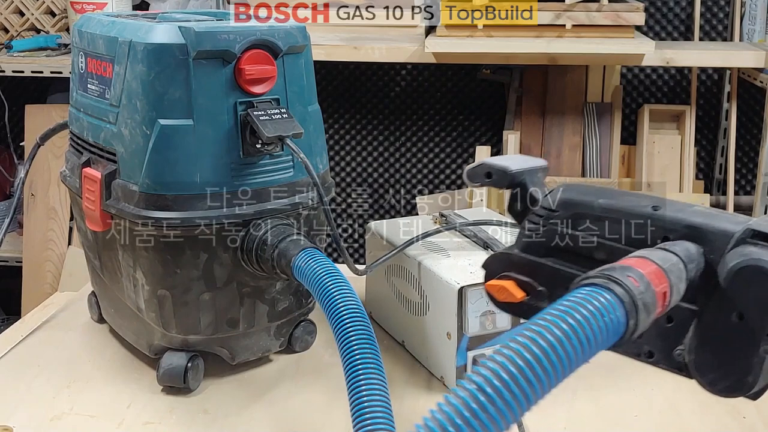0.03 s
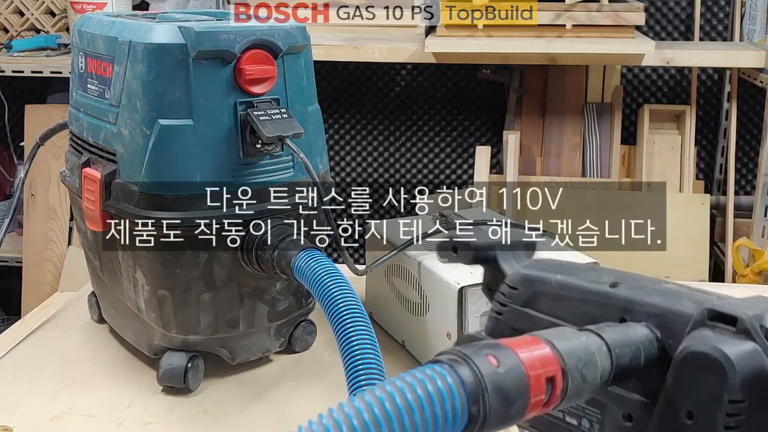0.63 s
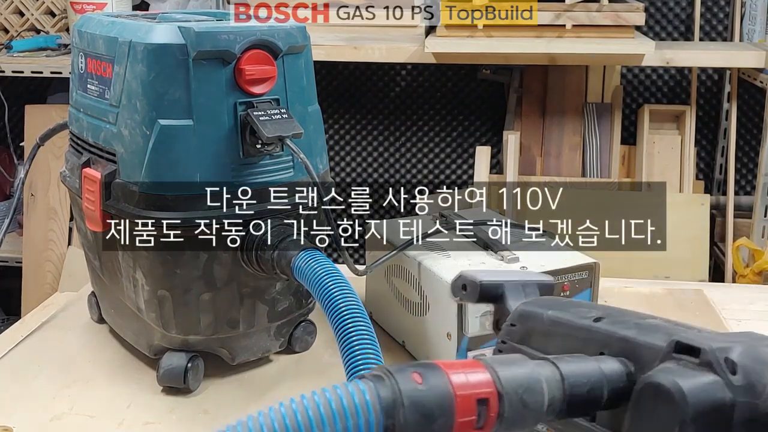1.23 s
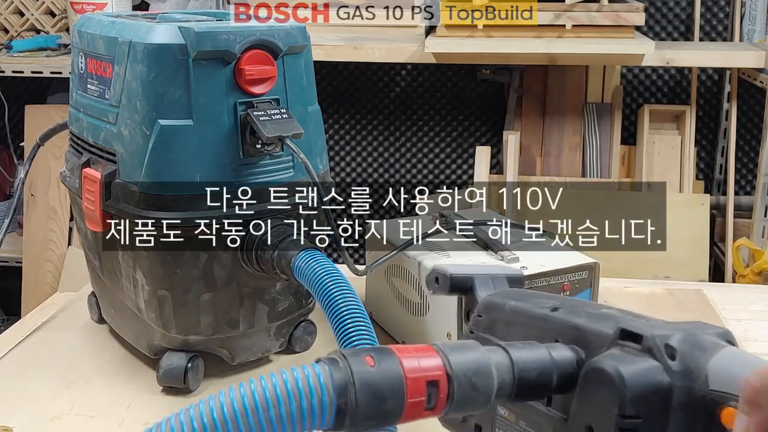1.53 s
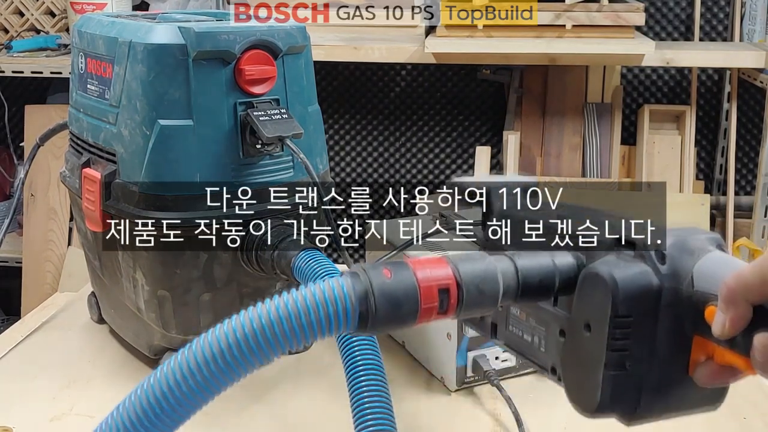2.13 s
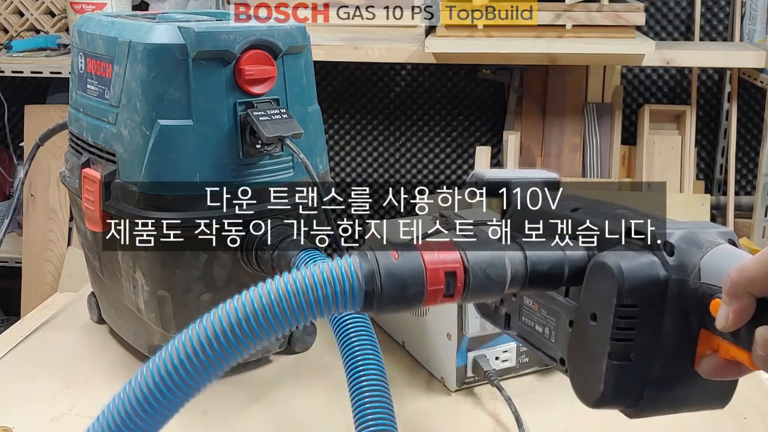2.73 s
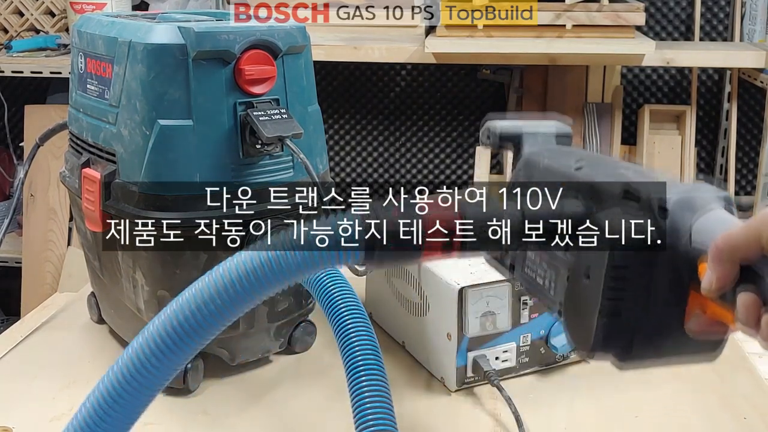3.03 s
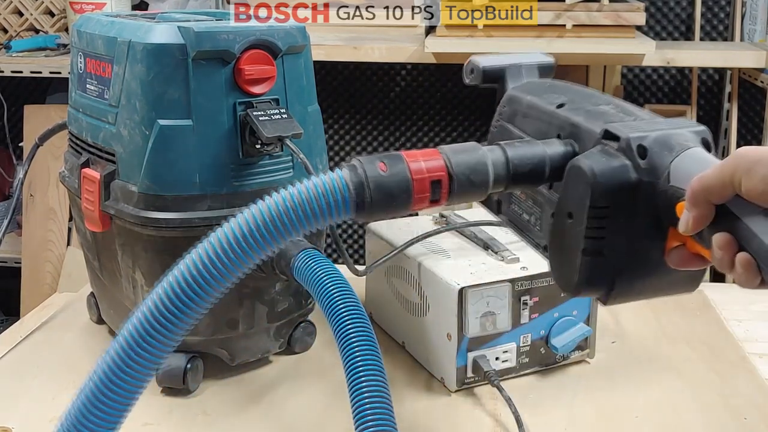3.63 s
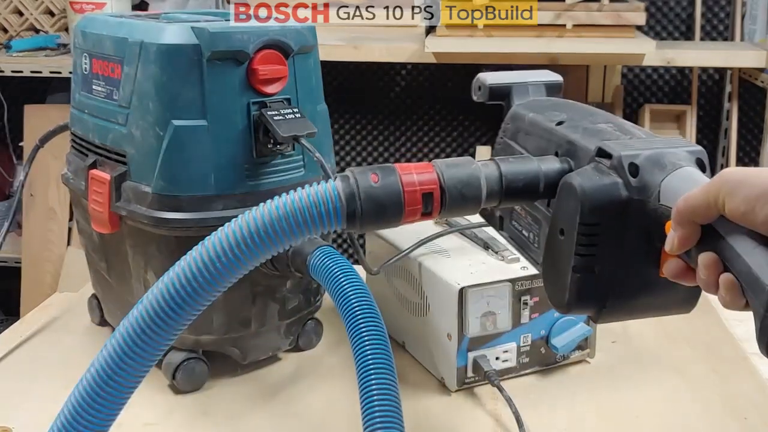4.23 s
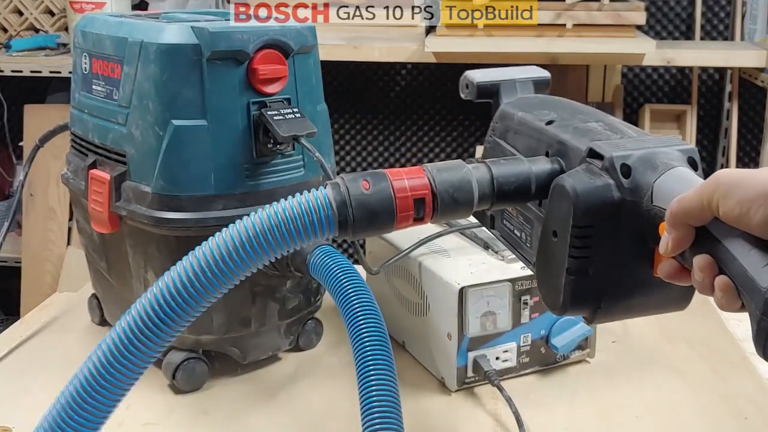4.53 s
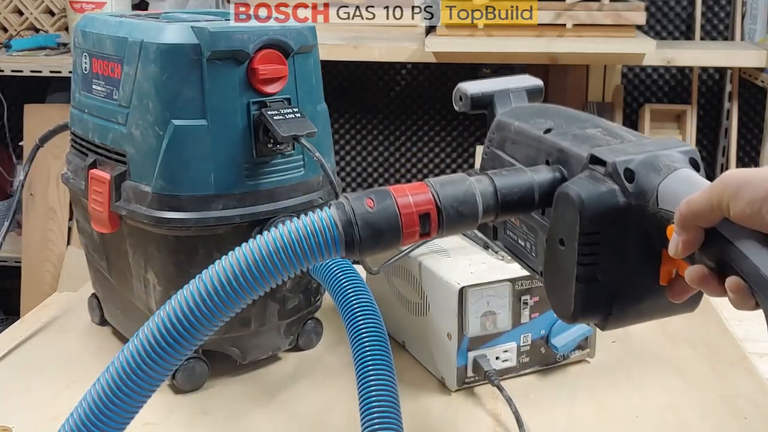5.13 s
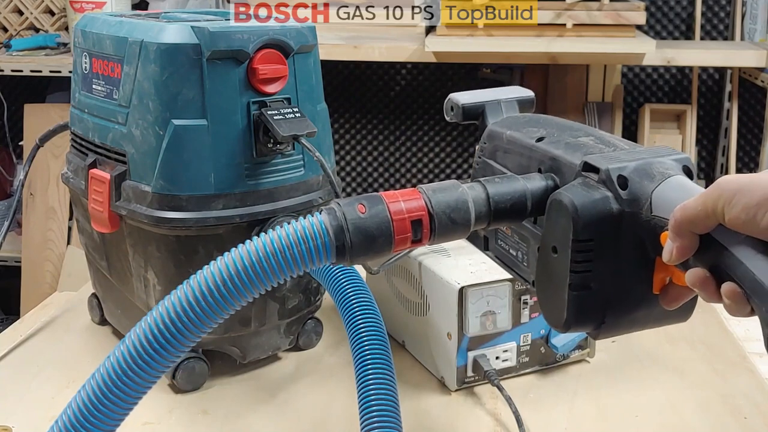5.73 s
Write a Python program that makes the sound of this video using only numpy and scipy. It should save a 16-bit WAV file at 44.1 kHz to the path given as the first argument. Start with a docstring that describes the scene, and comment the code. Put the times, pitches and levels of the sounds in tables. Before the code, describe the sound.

In a quiet workshop, faint rasps of a vacuum hose, a few dull bumps and low handling rumble come first. Then, near the microphone, a switch snaps and an electric tool knocks and whines quickly up to speed, joined by a shop vacuum's rushing air and hum. The tool runs only briefly before coasting down in pitch under the steady roar of the vacuum.

```python
"""Power tool in a woodshop

A corded tool is lifted, dragging its ribbed hose, and switched on close by. The trigger clicks, and the
motor jolts with the mains, whines up to speed and coasts down once the trigger is let go.
The dust extractor it is plugged into starts with it and keeps running, roaring and hissing with air."""
import sys
import numpy as np
from scipy import signal
from scipy.fft import rfft, irfft
from scipy.io import wavfile

SR = 44100
rng = np.random.default_rng(int(sys.argv[2]) if len(sys.argv) > 2 else 0)


def inscribe(sig):
    """Save sig as 16-bit PCM at rate SR to the path in sys.argv[1].

    A 1-D sig is mono; a 2-D sig holds one channel per row.
    Samples are clipped to [-1, 1] before scaling.
    """
    pcm = np.round(np.clip(np.atleast_2d(sig).T, -1, 1) * 32767)
    wavfile.write(sys.argv[1], SR, pcm.astype(np.int16))


N = 254898
TIME = np.arange(N) / SR
FREQ = np.fft.rfftfreq(N, 1 / SR)
SIDES = np.array([[.5], [-.5]])  # shares a left-minus-right amount between the two channels

PULSE_HZ = 120  # the power pulses twice in each mains cycle
BLADES = 5  # on the tool's fan and on the extractor's
SPIN_S, RELEASE_S, FULL_HZ = 3.593, 4.672, 431  # shaft breaks free, trigger let go, top turns per second

# Levels in the tables are relative: each sound also has its own overall loudness.
# the motor's weaker whines: cycles_per_turn
WHINE_MULTIPLES = (1, 2, 8, 10, 12, 15, 16, 19, 25)
# strength of each of those whines: full_speed_db, third_speed_db
WHINE_LEVELS = [(-29.5, -50), (-40, -58), (-34, -61), (-40, -37.5), (-46, -45), (-38, -36), (-58, -53),
                (-36.5, -33.5), (-44, -47.5)]
# strength of the fan blades' tone: full_speed_db, third_speed_db
BLADE_LEVELS = (-24.5, -29.5)
# shaft speeds where a whine swells, listed by cycles_per_turn: shaft_hz, width_hz, boost_db
CRITICAL_SPEEDS = {10: (194, 36, 4), 15: (137, 28, 7), 19: (366, 50, 2)}
# pitches where the motor's tones swell or fade as they sweep through: pitch_hz, width_hz, boost_db
TONE_PEAKS_AND_DIPS = [(595, 33, 7), (745, 65, -10.5), (908, 94, 7), (1040, 26, -12), (1480, 55, 6),
                       (1908, 916, 12.5), (2062, 31, -4), (2440, 390, -5.5), (3130, 680, 7.5),
                       (4914, 660, 7), (5650, 330, -1), (6870, 1280, 10.5), (9120, 900, -14.5)]
# the tool's cooling air: pitch_hz, level_db
COOLING_COLOUR = [(100, -37), (300, -16), (600, -4), (1300, 6.5), (2000, 8.5), (2500, 5), (3200, -20),
                  (6000, -4), (7200, 5.5), (8500, -9.5), (15000, -12)]
# where the tool is heard: pitch_hz, left_minus_right_db
TOOL_BALANCE = [(200, 0), (700, 2), (1300, 1.5), (2100, -7), (4400, 5.5), (8000, -4.5), (15000, 2)]
# the trigger's click, then the drive knocking as it takes up its slack: start_s, level_db
START_KNOCKS = [(3.457, -16.5), (3.544, -11), (3.594, -7), (3.652, -13), (3.661, -9.5), (3.67, -2.5),
                (3.679, -14)]
# how the trigger and the drive ring: pitch_hz, level_db, ring_s (time to fade by 60 dB)
KNOCK_RINGS = [(480, -30, 0.05), (823, 3.5, 0.021), (1100, -32, 0.021), (1440, -5, 0.022),
               (1923, -6.5, 0.044), (2090, -27, 0.02), (3070, -19, 0.016), (5050, -25, 0.023),
               (6700, -30, 0.027)]
# the tool's shuddering body: pitch_hz, level_db
SHUDDER_COLOUR = [(53, -61), (90, -30), (118, -4.5), (185, -33), (223, 1), (264, -26), (403, 2.5),
                  (448, -47), (669, -12), (899, 7), (1090, -5), (2090, 9.5), (2580, -4.5), (6830, -20),
                  (14000, -98)]

# air rushing through the extractor: pitch_hz, level_db
AIRFLOW_COLOUR = [(40, -34), (80, -14), (140, -9), (300, -7.5), (470, -4.5), (780, -0.5), (1300, -5.5),
                  (1800, -5), (2500, -6), (3100, -8), (4600, -9.5), (6000, -11.5), (7000, -3.5),
                  (8000, -13)]
# the top of the rushing air's hiss, brightest near 7 kHz: pitch_hz, level_db
HIGH_HISS_COLOUR = [(5500, 0), (6200, -10), (6900, 5), (7700, -5.5), (8400, -15.5), (9300, -8), (10000, -7),
                    (12000, -7.5), (12700, -21), (15500, -25)]
# pitches that the extractor's tank and hose boost: pitch_hz, width_hz, boost_db
TANK_RESONANCES = [(132.4, 9.6, 7.5), (226.5, 26, 6.5), (554.6, 13, 10), (589.6, 7.3, 9.5), (655, 15, 6.5),
                   (886, 4.8, 9), (938, 10, 7), (1150, 22, 9.5), (1270, 5.6, 12), (1434, 4, 14),
                   (1735, 79, 9), (1920, 148, 13), (2205, 18, 13.5), (3060, 180, 8.5)]
# the lid's resonance, which the extractor's hum climbs into: pitch_hz, width_hz, boost_db
LID_RESONANCE = [(431.2, 18, 19)]
# where the extractor's air is heard: pitch_hz, left_minus_right_db
AIRFLOW_BALANCE = [(60, 1), (110, -0.5), (200, 0.5), (380, 1), (700, 3), (1290, 0), (2380, -6), (4400, 1.5),
                   (8120, -3), (15000, 13)]

# slides of the hose as the tool is lifted: middle_s, half_length_s, rasp_db, hiss_db
HOSE_SLIDES = [(0.078, 0.25, -56, -61), (0.344, 0.085, -63, -64), (.53, 0.085, -57, -58),
               (0.754, 0.096, -56, -56.5), (1.116, 0.11, -49.5, -49.5), (1.258, 0.17, -60.5, -61),
               (1.556, 0.21, -78, -73.5)]
# the hose's rubbing sound: pitch_hz, level_db
RUB_COLOUR = [(200, -2), (400, -1), (650, 3), (1250, 0.5), (1800, 3), (2400, -2.5), (3500, -5.5),
              (4600, -11.5), (6100, -16), (7100, -8.5), (8400, -41), (11500, -23.5), (15000, -40)]
# pitches that the ribbed hose boosts: pitch_hz, width_hz, boost_db
HOSE_RESONANCES = [(1930, 71, 3), (2430, 260, 1.5), (3000, 40, 5.5), (4270, 110, 5)]
# where the hose is heard: pitch_hz, left_minus_right_db
HOSE_BALANCE = [(60, -3), (110, 2.0), (200, 2), (380, 0), (700, 0.0), (1290, -2.5), (2380, -11.5),
                (4400, -5), (8120, -19.5), (15000, 14)]
# hose and cable bumping the bench: start_s, level_db
BENCH_BUMPS = [(0.182, -24.5), (0.274, -30), (0.294, -21), (0.321, -31)]
# the dull thud of a bump: pitch_hz, level_db
THUD_COLOUR = [(60, 2), (120, -2), (240, 9.5), (450, -1), (900, -5.5), (1400, -16), (2200, -17),
               (4000, -47), (12000, -55)]
# the hand shifting its grip: middle_s, half_length_s, level_db
GRIP_SHIFTS = [(.05, 0.16, -50.5), (.44, 0.097, -46.5), (.75, 0.36, -56.5), (1.42, 0.23, -59),
               (2.36, 0.016, -50), (2.66, 0.17, -60)]
# the rumble of the grip: pitch_hz, level_db
GRIP_COLOUR = [(12, -39), (20, 7.5), (33, 3), (76, 4.5), (126, -5), (145, -13), (252, -7.5), (371, -16),
               (400, -11), (520, -34), (880, -120)]

# the quiet of the shop: pitch_hz, level_db
SHOP_COLOUR = [(59, -34), (100, 3), (252, -13), (297, -6.5), (337, -21), (407, -8.5), (582, -15.5),
               (1810, -26), (2520, -28), (4450, -34), (15000, -60)]
# how alike left and right sound: pitch_hz, likeness (0 unrelated, 1 the same)
STEREO_LIKENESS = [(60, 0.97), (280, 0.96), (640, 0.57), (1400, 0.41), (3000, 0), (15000, 0)]


def power_tool(wobble=0.001504, left_lag_s=.00009, load_db=10, spindle_db=-39, air_db=-28, fade_s=0.14):
    """The motor's fan tone, whines and cooling air all follow the speed of its shaft."""
    hz = shaft_hz() * (1 + wobble * walk(21.6))
    speed, powered = hz / FULL_HZ, TIME < RELEASE_S
    slowness = np.minimum((1 - speed) * 3 / 2, 1)  # 0 at full speed, 1 at a third of it
    load = powered * (1 - speed)
    angle = 2 * np.pi * (np.cumsum(hz) / SR - SIDES * left_lag_s * hz)  # the tool is nearer the right

    def gain(multiple, fast_db, slow_db):
        """A tone's strength follows speed and load, and swells or fades at certain pitches."""
        db = fast_db + (slow_db - fast_db) * slowness + load_db * load
        db += resonances(TONE_PEAKS_AND_DIPS, multiple * hz)
        return undb(db + SIDES * at(TOOL_BALANCE, multiple * hz))

    # while the trigger is held, the motor pulses with the mains, hardest when it is still slow
    mains = 2 * np.pi * PULSE_HZ * TIME
    throb = 1 + (0.31 * powered + 0.44 * load) * np.cos(mains)
    blades = tone(BLADES * angle - 0.025 * powered * np.sin(mains), rough=0.17, flutter_hz=62)
    blades *= throb * gain(BLADES, *BLADE_LEVELS)
    # with the power off, the shaft shivers in its bearings, which roughens the high whines
    shiver = np.where(powered, .012, .055)
    whines = 0
    for multiple, levels in zip(WHINE_MULTIPLES, WHINE_LEVELS):
        whine = tone(multiple * (angle + shiver * walk(54)), rough=.3, flutter_hz=36)
        waver_db = walk(8.9)
        swell_db = resonances([CRITICAL_SPEEDS[multiple]], hz) if multiple in CRITICAL_SPEEDS else 0
        whines += whine * gain(multiple, *levels) * undb(waver_db + swell_db)
    whines *= 1 + 0.23 * powered * np.cos(mains)
    # the geared-down spindle hums at about half the motor's rate
    spindle = tone(angle * .512, rough=.25, flutter_hz=12) * speed ** 12 * undb(spindle_db)
    air = noise(at(COOLING_COLOUR, FREQ), at(TOOL_BALANCE, FREQ)) * undb(air_db) * speed ** 4.7
    # the fan tone has little echo; the whines beam into the shop and come back smeared
    near = room(blades + spindle, ring_s=0.16, echo_db=-13)
    smeared = room(whines, ring_s=0.19, echo_db=-4)
    return (near + smeared + air) * np.clip((TIME - SPIN_S) / fade_s, 0, 1)


def shaft_hz(surge_s=.0808, creep_s=.2735, surge_share=.522, drag_s=1.81, friction_hz_per_s=186.5):
    """Turns per second: a quick surge and a slow creep up, then air drag and rubbing brushes brake it."""
    driven = FULL_HZ * (surge_share * rise(SPIN_S, surge_s) + (1 - surge_share) * rise(SPIN_S, creep_s))
    held = np.minimum(driven, np.interp(RELEASE_S, TIME, driven))
    lost = (held + friction_hz_per_s * drag_s) * rise(RELEASE_S, drag_s)
    return np.maximum(held - lost, 1)


def switch_on():
    """The jolt of starting: shudder and knocks echo in the shop, while the trigger's snap stays dry."""
    return room(motor_shudder() + drive_knocks(), ring_s=0.46, echo_db=-3.5) + trigger_snap()


def motor_shudder(peak_s=3.662, rise_db_per_s=128, fall_db_per_s=180, buzz_db=6):
    """The straining motor shakes the tool's body with each mains pulse, and each knock adds a crack."""
    strain_db = -19.5 + np.minimum(rise_db_per_s * (TIME - peak_s), fall_db_per_s * (peak_s - TIME))
    pulses = np.cos(2 * np.pi * PULSE_HZ * (TIME - START_KNOCKS[-1][0] - .002))
    strain = undb(strain_db + buzz_db * pulses) * (TIME > START_KNOCKS[0][0])
    cracks = undb(-12) * blows(START_KNOCKS, decay_s=0.0057)
    force = noise(colour_db=0) * np.hypot(strain, cracks)
    body = undb(at(SHUDDER_COLOUR, FREQ))
    body /= np.sqrt(np.mean(body ** 2))
    return irfft(rfft(force) * body * undb(SIDES * at(TOOL_BALANCE, FREQ)), N)


def drive_knocks(gain_db=-10, balance_db=-3):
    """Trigger and drive knock in the housing, ringing at slightly different pitches each time."""
    knocks = 0
    for start_s, knock_db in START_KNOCKS:
        age = np.clip(TIME - start_s, 0, .2)
        contact = 1 - np.exp(-age / 0.00087)  # plastic gives a little
        for hz, ring_db, ring_s in KNOCK_RINGS:
            pitch_hz = hz * (1 + .02 * rng.standard_normal())
            ring = np.sin(2 * np.pi * pitch_hz * age) * 1000 ** (-age / ring_s)
            knocks += undb(knock_db + ring_db) * ring * contact
    return knocks * undb(gain_db + SIDES * balance_db)


def trigger_snap(peak_db=-25, decay_s=0.0014):
    """The trigger's contacts close with one short snap."""
    age = np.maximum(TIME - START_KNOCKS[0][0] - .001, 0)
    snap = sum(undb(db) * np.sin(2 * np.pi * hz * age) for hz, db, _ in KNOCK_RINGS)
    snap *= np.exp(-age / decay_s)
    return snap * undb(peak_db) / np.abs(snap).max()


def mains_hum(start_s=3.58, rise_s=0.097, decay_s=0.14, gain_db=-35):
    """The starting current makes the motor's iron hum, fading as the current falls."""
    age = np.maximum(TIME - start_s, 0)
    current = np.minimum(age / rise_s, 1) * np.exp(-age / decay_s)
    angle = 2 * np.pi * PULSE_HZ * TIME
    hum = sum(tone(multiple * angle, rough=1.0, flutter_hz=6.3) for multiple in (1, 2))
    return hum * current * undb(gain_db)


def extractor(start_s=3.46, flow_rise_s=0.2, fan_rise_s=.42, full_hz=428.1, split_hz=2600):
    """Air roars and hisses through tank and hose as the flow builds; the fan hums as it gathers speed."""
    flow, speed = rise(start_s, flow_rise_s), rise(start_s, fan_rise_s)
    colour = at(AIRFLOW_COLOUR, FREQ) + resonances(TANK_RESONANCES, FREQ)
    balance = at(AIRFLOW_BALANCE, FREQ)
    roar = noise(colour + cut_above(split_hz), balance, band_hz=(110, 750))
    roar *= undb(-30 + 1.07 * walk(5.2)) * flow
    hiss = noise(colour + cut_below(split_hz) + cut_above(6000, 12), balance, band_hz=(3600, 12000))
    high_hiss = noise(at(HIGH_HISS_COLOUR, FREQ) + cut_below(6000, 12), balance)
    treble = (undb(-29) * hiss + undb(-34.5) * high_hiss) * undb(.6 * walk(17)) * flow ** 2.76
    treble *= 1 + 0.081 * np.cos(2 * np.pi * PULSE_HZ * TIME)  # a slight throb
    hz = full_hz * speed
    angle = 2 * np.pi * np.cumsum(hz) / SR
    hum = tone(angle, rough=0.24, flutter_hz=2.166) * undb(-45 + resonances(LID_RESONANCE, hz))
    whine = tone(BLADES * angle, rough=0.35, flutter_hz=56) * undb(-37)
    return roar + treble + (hum + whine) * speed ** 2


def sliding_hose(split_hz=3300):
    """The ribbed hose slides in a few strokes, each with a rasp and a higher hiss."""
    middle_s, half_s, rasp_db, hiss_db = np.transpose(HOSE_SLIDES)
    colour = at(RUB_COLOUR, FREQ) + resonances(HOSE_RESONANCES, FREQ)
    close_right = dict(balance_db=at(HOSE_BALANCE, FREQ), min_likeness=0.58, left_lag_s=0.000423)
    rasp = noise(colour + cut_above(split_hz), band_hz=(1500, 3200), **close_right)
    hiss = noise(colour + cut_below(split_hz), band_hz=(3500, 8000), **close_right)
    rasp *= swells(zip(middle_s, half_s, rasp_db))
    hiss *= swells(zip(middle_s, half_s, hiss_db))
    return (rasp + hiss) * undb(0.51 * walk(120))  # the ribs catch unevenly


def bench_bumps():
    """Hose and cable land softly: short scuffs, dulled by the plastic and the bench."""
    scuffs = rng.standard_normal(N) * blows(BENCH_BUMPS, decay_s=0.0039)
    thuds = irfft(rfft(scuffs) * undb(at(THUD_COLOUR, FREQ)), N)
    return room(np.stack([thuds, thuds]), ring_s=0.34, echo_db=2)


def grip_rumble():
    """The hand on the tool makes a faint rumble that swells when the grip shifts."""
    rumble = noise(at(GRIP_COLOUR, FREQ))
    holding = undb(-67 + 3.5 * walk(11))
    return rumble * np.hypot(holding, swells(GRIP_SHIFTS))


def exhaust_puff(middle_s=3.81, half_length_s=0.056, level_db=-37):
    """A puff of exhaust air brushes the microphone: a deep thump on the right."""
    colour = at([(12, -40), (28, -14), (45, 16), (80, -1), (200, -23), (1000, -47)], FREQ)
    return noise(colour, balance_db=-19) * swells([(middle_s, half_length_s, level_db)])


def quiet_shop(level_db=-67):
    """The faint, steady, low noise of the room."""
    return noise(at(SHOP_COLOUR, FREQ), band_hz=(150, 15000)) * undb(level_db)


def room(sound, ring_s, echo_db):
    """A sound plus its many quick echoes from bench and shelves."""
    t = TIME[:SR // 2]
    tail = rng.standard_normal((2, len(t))) * 1000 ** (-t / ring_s) * (t > .002)
    tail /= np.sqrt(np.sum(tail ** 2, axis=1, keepdims=True))
    return sound + undb(echo_db) * signal.fftconvolve(sound, tail, axes=1)[:, :N]


def tone(phase, rough, flutter_hz):
    """A tone whose level and timing flutter, as when swirling air meets a fan."""
    main = (1 + rough * walk(flutter_hz)) * np.sin(phase)
    jitter = rough * walk(flutter_hz) * np.cos(phase)
    return np.sqrt(2) * (main + jitter)


def noise(colour_db, balance_db=0, band_hz=(0, SR), min_likeness=-1, left_lag_s=0):
    """Stereo noise with a colour (a level for each pitch), scaled so the part in band_hz has strength 1."""
    alike = np.clip(np.maximum(at(STEREO_LIKENESS, FREQ), min_likeness), -1, 1)
    mid, side = rfft(rng.standard_normal((2, N)))
    both = mid * np.sqrt(1 + alike) + 2 * SIDES * side * np.sqrt(1 - alike)
    both *= undb(colour_db + SIDES * balance_db)
    both *= np.exp(-2j * np.pi * FREQ * SIDES * left_lag_s)
    inside = (FREQ >= band_hz[0]) & (FREQ <= band_hz[1])
    return irfft(both, N) / irfft(both.mean(0) * inside, N).std()


def walk(rate_hz):
    """A smooth random wiggle of typical size 1, changing about rate_hz times a second."""
    wiggle = irfft(rfft(rng.standard_normal(N)) / (1 + (FREQ / rate_hz) ** 4), N)
    return wiggle / wiggle.std()


def blows(rows, decay_s):
    """Loudness over time of sudden hits, each dying away."""
    return sum(undb(db) * (TIME >= s) * np.exp(-np.abs(TIME - s) / decay_s) for s, db in rows)


def swells(rows):
    """Loudness over time of smooth swells; their powers add."""
    return np.sqrt(sum((undb(db) * np.exp(-((TIME - s) / half_s) ** 2)) ** 2 for s, half_s, db in rows))


def rise(start_s, rise_s):
    """A climb from 0 towards 1, about two thirds done after rise_s."""
    return 1 - np.exp(-np.maximum(TIME - start_s, 0) / rise_s)


def resonances(rows, hz):
    """The change in dB that a set of peaks and dips gives at each pitch."""
    return sum(db / (1 + (2 * (hz - centre) / width) ** 2) for centre, width, db in rows)


def cut_above(hz, steepness=8):
    """A curve in dB that fades out the pitches above hz."""
    return -10 * np.log10(1 + ((FREQ + 1) / hz) ** steepness)


def cut_below(hz, steepness=8):
    """A curve in dB that fades out the pitches below hz."""
    return cut_above(hz, -steepness)


def at(points, hz):
    """Read a table at any pitch, sliding between its rows on a musical (log) scale."""
    pitches, values = np.transpose(points)
    return np.interp(np.log(np.maximum(hz, 1)), np.log(np.maximum(pitches, 1)), values)


def undb(db):
    """Turn decibels into a number to multiply by."""
    return 10 ** (np.asarray(db) / 20)


def scene():
    """Both machines and the handling of the tool, over the quiet of the shop."""
    shop = quiet_shop()
    machines = power_tool() + switch_on() + mains_hum() + extractor()
    handling = sliding_hose() + bench_bumps() + grip_rumble()
    return machines + handling + exhaust_puff() + shop


def record(dry, top_hz=15800):
    """Clip the peaks at full scale and cut the highest treble."""
    treble_cut = signal.ellip(10, .1, 80, top_hz, fs=SR, output="sos")
    return signal.sosfilt(treble_cut, np.clip(dry, -1, 1))


dry = scene()
out = record(dry)
inscribe(out)
```